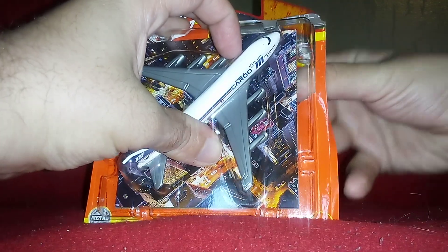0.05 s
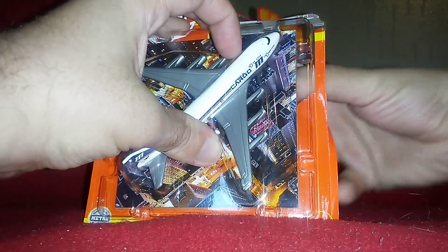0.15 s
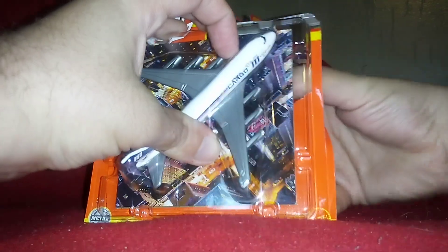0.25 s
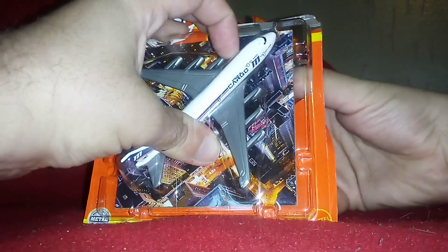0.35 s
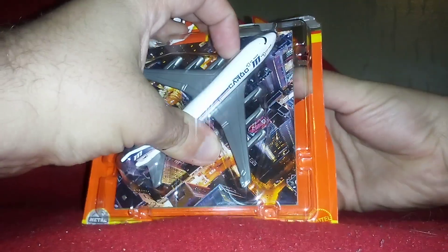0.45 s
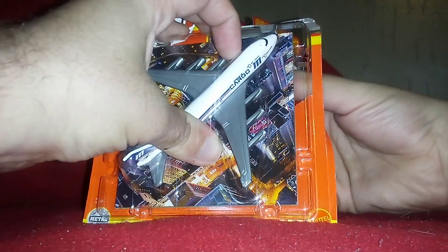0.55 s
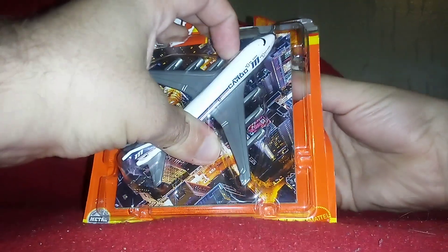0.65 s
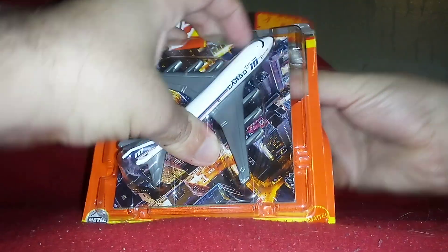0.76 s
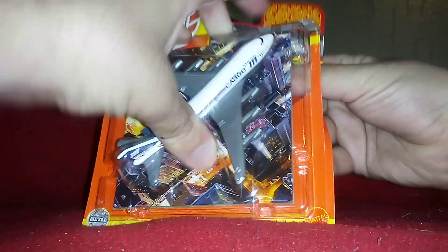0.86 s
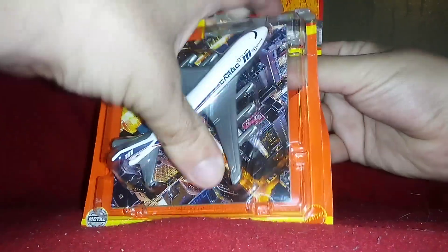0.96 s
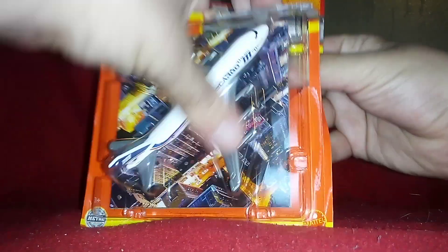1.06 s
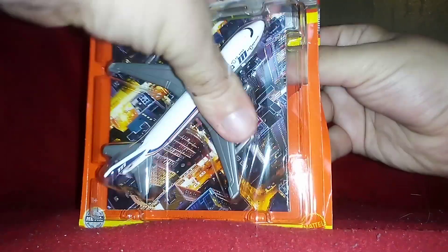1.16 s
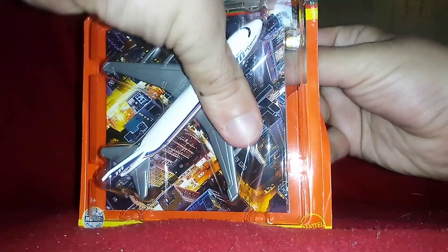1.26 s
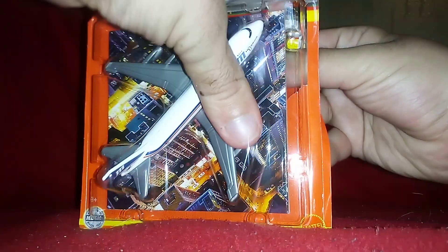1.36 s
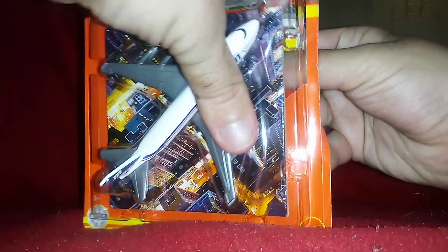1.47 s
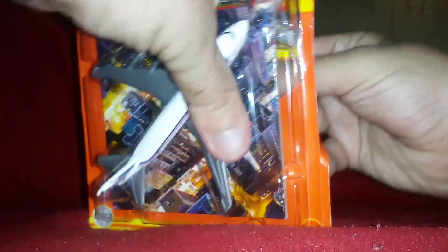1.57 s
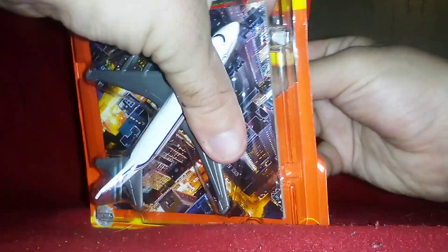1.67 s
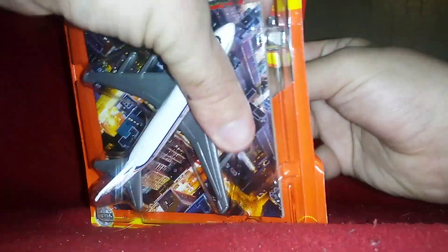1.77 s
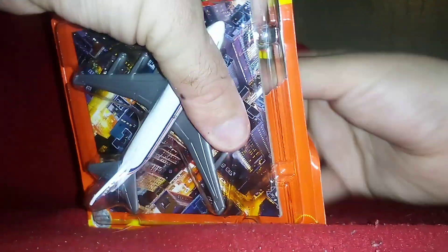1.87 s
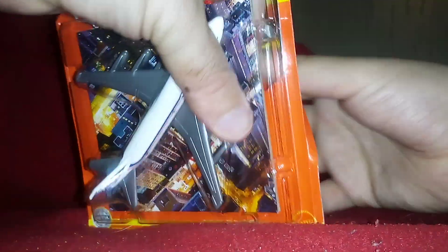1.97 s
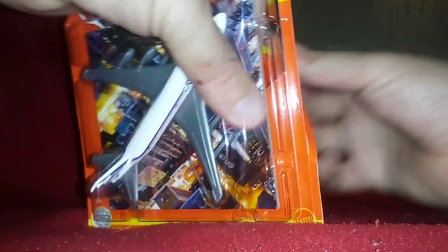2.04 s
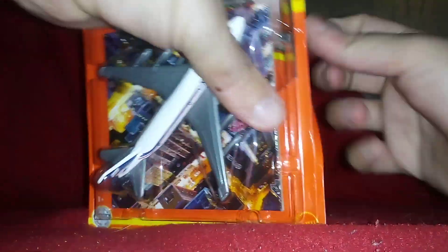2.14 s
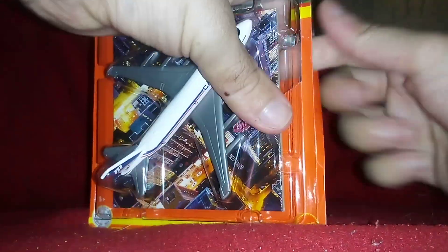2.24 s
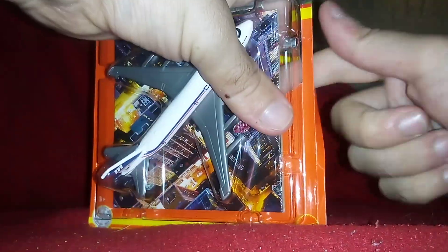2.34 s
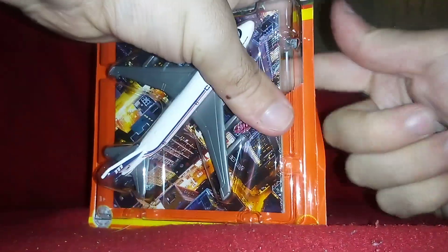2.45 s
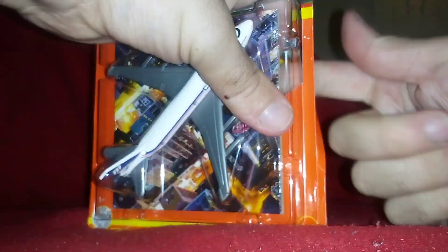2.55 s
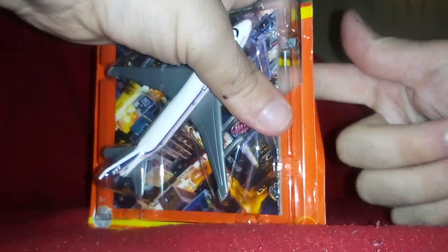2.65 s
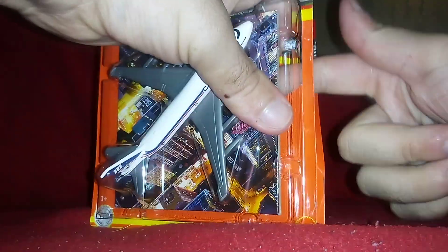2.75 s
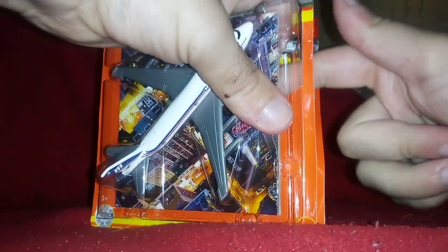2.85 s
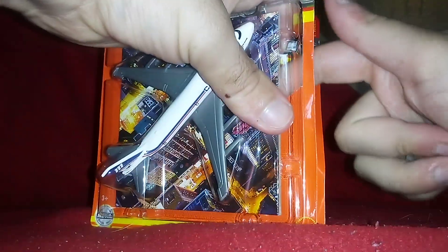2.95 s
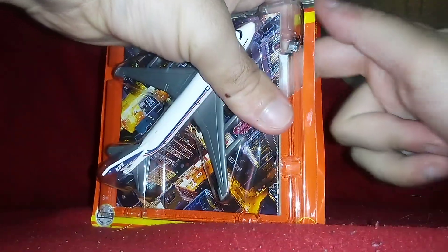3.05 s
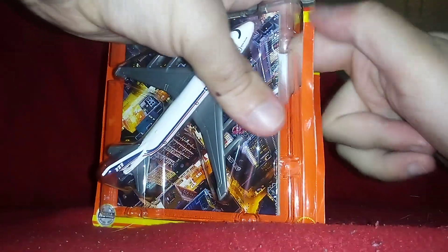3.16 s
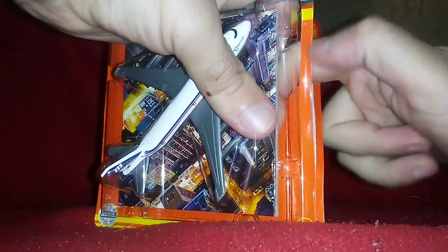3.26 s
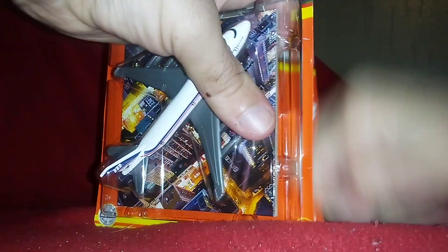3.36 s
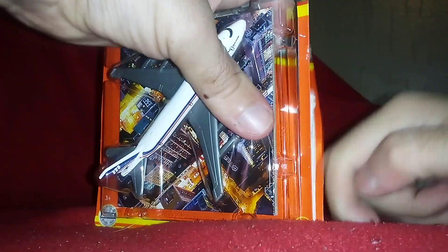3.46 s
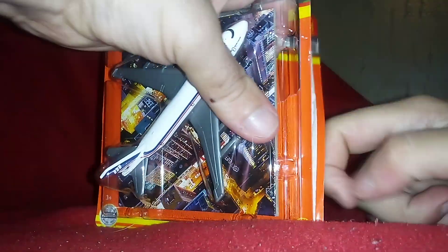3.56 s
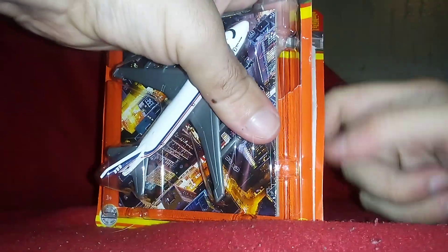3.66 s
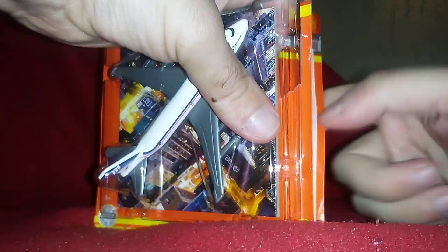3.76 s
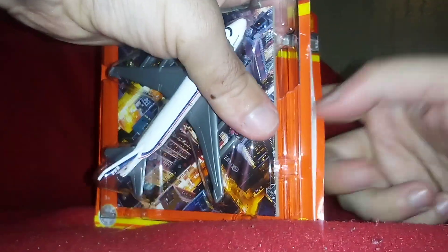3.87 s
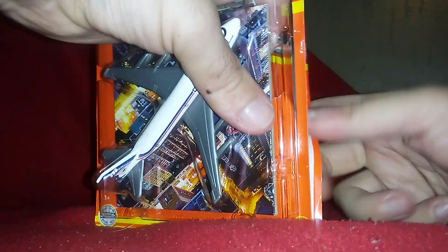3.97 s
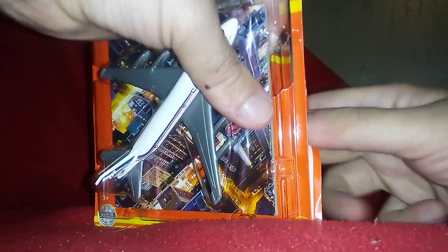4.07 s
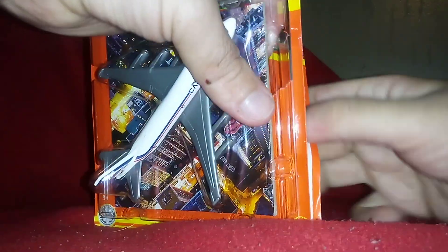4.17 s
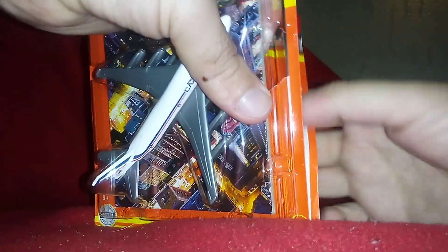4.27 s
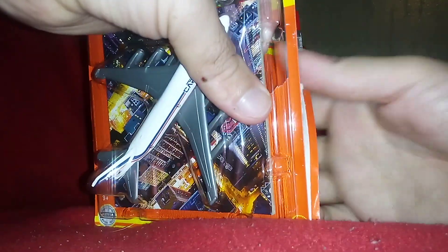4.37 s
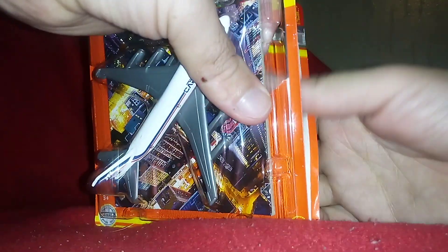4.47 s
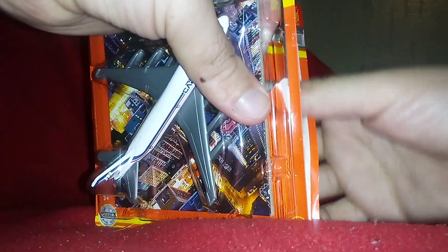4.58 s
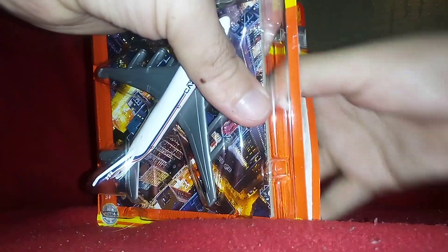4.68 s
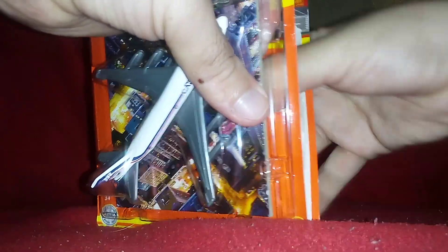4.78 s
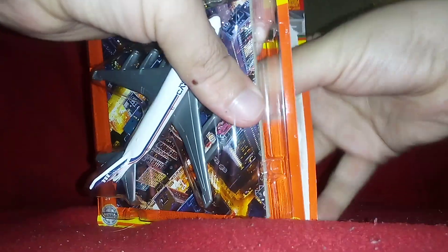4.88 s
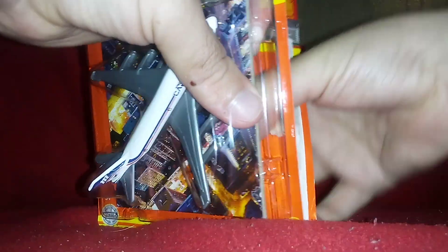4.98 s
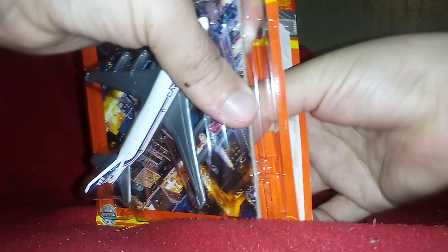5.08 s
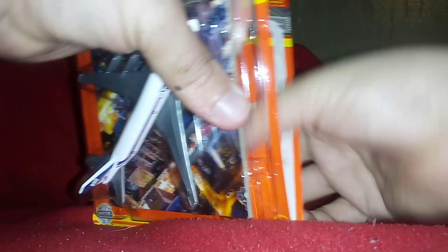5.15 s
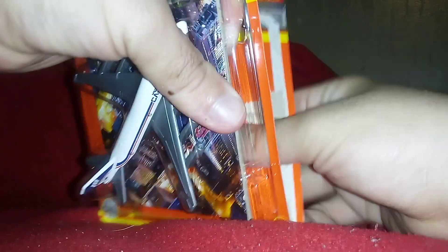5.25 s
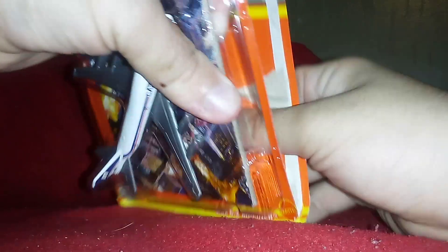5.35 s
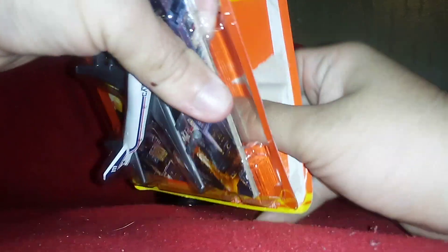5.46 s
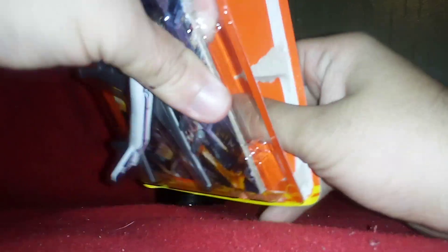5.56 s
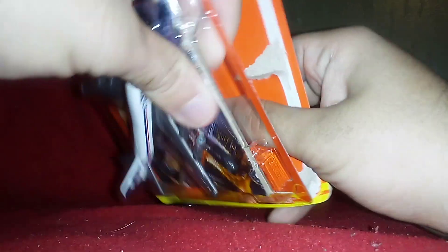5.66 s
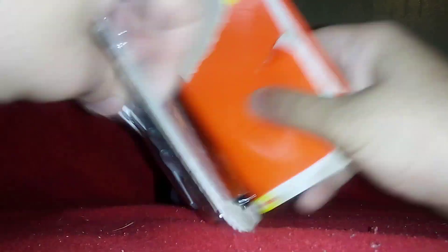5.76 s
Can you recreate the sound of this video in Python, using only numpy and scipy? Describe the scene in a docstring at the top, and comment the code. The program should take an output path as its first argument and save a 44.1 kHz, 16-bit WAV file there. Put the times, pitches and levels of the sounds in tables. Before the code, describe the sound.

Close to the microphone in a small, quiet room, hands pull a plastic blister off its cardboard backing. Soft scraping and dry ticks run between three bursts of rasping rips and sharp plastic cracks: one early, one midway and one at the end. In between, the pack gives low, hollow bumps, the bent card creaks, and the metal toy inside clinks faintly.

```python
"""Two hands work a plastic blister off its card, close to the microphone, over a cloth-covered table.
Fingers slide and scrape, the stiff shell buckles and snaps, and from 1.1 s the glued edge starts to rip.
Hollow bumps jolt the metal toy inside, the bent card creaks towards 3 s, and a hard snap brings a rip.
After more scraping, the last rips and loud snaps come from 5.4 s on. Every snap and scrape rings
through the same few resonances of the pack, in a small, quiet room."""
import sys
import numpy as np
from scipy import signal
from scipy.fft import rfft, irfft
from scipy.io import wavfile

SR = 44100
rng = np.random.default_rng(int(sys.argv[2]) if len(sys.argv) > 2 else 0)


def master(y):
    """Save y as 16-bit WAV."""
    cut = np.clip(np.atleast_2d(y).T, -1, 1)
    pcm = np.round(cut * 32767)  # scale
    wavfile.write(sys.argv[1], SR, pcm.astype(np.int16))


N = 256662
LEAD_S = .025  # a slip's force starts this long before it lets go

# modes of each part of the pack, from the softest to the stiffest: f/Hz, width/Hz, level/dB
THUD_MODES = [(102, 42, -4), (135, 71, -1.5), (168, 87, -4), (230, 130, 1)]
CARD_MODES = [(280, 110, -15), (419, 37, -2.5), (482, 73, 5.5), (700, 270, -5.5)]
SHELL_MODES = [(725, 65, -3), (800, 60, -7), (868, 60, 0), (920, 40, -6)]
WALL_MODES = [(1095, 70, -1), (1205, 75, 0), (1310, 75, -1)]
CREASE_MODES = [(1640, 190, 0), (1940, 190, 0), (2330, 350, -4), (2900, 400, -6), (3400, 500, -9)]
EDGE_MODES = [(3890, 130, -10), (4300, 2800, 4.5), (5290, 670, -5), (5910, 210, -2), (6370, 560, 9.5),
              (6700, 210, -4)]
PARTS = [THUD_MODES, CARD_MODES, SHELL_MODES, WALL_MODES, CREASE_MODES, EDGE_MODES]
# band in which each part radiates: low f/Hz, high f/Hz
PART_BANDS = [(50, 376), (230, 675), (620, 954), (1050, 1331), (1450, 3130), (3800, 8600)]


def from_db(db):
    """Decibels to gain."""
    return 10 ** (np.asarray(db) / 20)


def rms_one(x):
    """Scale to unit power."""
    return x / np.sqrt(np.mean(x ** 2) + 1e-30)


def at_level(ring, db):
    """Scale a ring so that its energy, spread over 10 ms, has this level."""
    return from_db(db) * ring / np.sqrt(np.sum(ring ** 2) / (.01 * SR))


def drift(rate):
    """A random wander of unit power that changes about rate times a second."""
    steps = np.arange(N) * rate / SR
    return rms_one(np.interp(steps, np.arange(N), rng.standard_normal(N)))


def resonate(force, modes, band_hz, strengths_db):
    """A force rings a part's modes, each as strongly as the point of contact allows."""
    out = 0
    for (hz, width_hz, db), strength_db in zip(modes, strengths_db):
        radius = np.exp(-np.pi * width_hz / SR)
        feedback = [1, -2 * radius * np.cos(2 * np.pi * hz / SR), radius ** 2]
        ring = signal.lfilter([1, 0, -1], feedback, force + 1e-18)
        out = out + (1 - radius ** 2) * ring * from_db(db + strength_db)
    return signal.sosfilt(signal.butter(3, band_hz, "band", fs=SR, output="sos"), out)


def part_levels(at_s, db, treble_db, bass_db, mix_db):
    """Level of each part for one contact: weight shakes the soft parts, sharpness the stiff ones."""
    # the card rings more freely once it has come away from the blister: t/s, gain/dB
    card_freedom = [(0, -2), (3.3, 0), (4.5, -4.5), (4.8, 4.5)]
    free_db = np.interp(at_s, *np.transpose(card_freedom))
    card_db, shell_db, wall_db, crease_db = mix_db  # how readily this kind of contact rings each
    return [db + bass_db,
            db + card_db + free_db + 0.35 * bass_db,
            db + shell_db,
            db + wall_db,
            db + crease_db + 0.31 * treble_db,
            db + treble_db]


def room_tone():
    """Steady faint noise of the room, under everything."""
    # spectrum of the quiet room: f/Hz, relative density/dB
    spectrum = [(20, -15.5), (70, 12.5), (150, -7.5), (400, -29.5), (850, -18), (2000, -11), (4500, -17),
                (6600, -19.5), (9000, -45)]
    hz, db = np.transpose(spectrum)
    bins_hz = np.maximum(np.fft.rfftfreq(N, 1 / SR), 1)
    colour = from_db(np.interp(np.log(bins_hz), np.log(hz), db))
    return from_db(-75.5) * rms_one(irfft(rfft(rng.standard_normal(N)) * colour, N))


def catches(per_s, size_db):
    """Random catches, most of them small and a few large; power 1."""
    sizes = from_db(size_db * np.minimum(rng.exponential(1, N), 3.5))
    signs = rng.choice([-1, 1], N)
    return rms_one(sizes * signs * (rng.random(N) < per_s / SR))


def friction(smooth_db, tick_db, judder_db, judder_rate):
    """Fibres break in uneven clumps over a smooth sliding hiss, and the plastic ticks; power 1."""
    fibres = catches(per_s=2500, size_db=3.5)
    ticks = from_db(tick_db) * catches(per_s=76, size_db=4.5)
    hiss = from_db(smooth_db) * rng.standard_normal(N)
    return rms_one((fibres + ticks + hiss) * from_db(judder_db * drift(judder_rate)))


def stroke_gains(strokes, attack_db_per_s, release_db_per_s, mix_db):
    """Gain of each part over time: a stroke sets in, swells or eases evenly, and dies away."""
    t = np.arange(0, N, 32) / SR
    gains = 0
    for start, end, start_db, end_db, treble_db, bass_db in strokes:
        fade_db = attack_db_per_s * np.maximum(start - t, 0) + release_db_per_s * np.maximum(t - end, 0)
        db = np.interp(t, [start, end], [start_db, end_db]) - fade_db
        hiss_db = treble_db - 0.12 * fade_db  # the hiss fades before the body does
        gains = np.maximum(gains, from_db(part_levels(start, db, hiss_db, bass_db, mix_db)))
    return [np.interp(np.arange(N) / SR, t, gain) for gain in gains]


def hand_echo(x, lag_s, sway, sway_rate, echo_db):
    """Sound bounces off the moving hands, so a shifting ripple colours it."""
    n = np.arange(N)
    lag_samples = lag_s * SR * np.exp(sway * drift(sway_rate))
    echo = np.interp(n - lag_samples, n, x)
    return (x + from_db(echo_db) * echo) / np.hypot(1, from_db(echo_db))


def rubbing(force, gains):
    """Friction drives every part of the pack."""
    out = 0
    for modes, band_hz, gain in zip(PARTS, PART_BANDS, gains):
        # as the contact travels, modes take turns to stand out: what one gains the others lose
        turns_db = np.array([2.6 * drift(16) for mode in modes])
        turns_db -= turns_db.mean(axis=0)
        out = out + gain * rms_one(resonate(force, modes, band_hz, turns_db))
    return hand_echo(out, lag_s=.0016, sway=.3, sway_rate=6.4, echo_db=-11.0)


def finger_slides():
    """Fingers slide and scrape over card and plastic with a grainy hiss."""
    # finger strokes: start t/s, end t/s, start level/dB, end level/dB, treble/dB and bass/dB re level
    strokes = [(0, .015, -47, -52.5, -5.5, -17), (.03, .18, -61.5, -61, 0.5, -17.5),
               (.2, .275, -54, -56.5, -11, -26), (.4, .53, -56, -62.5, -15.5, -15),
               (.66, .76, -76.5, -63, -4, -5.5), (.77, .95, -60, -53, -11, -24.5),
               (.99, 1.11, -72.5, -50.5, -6.5, -15.5), (1.24, 1.28, -57.5, -65, 1, -7),
               (1.78, 1.83, -55, -53, -4, -18), (1.87, 1.92, -70.5, -62, 0, -5),
               (1.945, 1.99, -56, -54, -9, -3.5), (2.01, 2.25, -60, -63.5, -5, -10),
               (2.35, 2.45, -69.5, -65, -9.5, -8), (2.56, 2.85, -67.5, -67, -28, -1.5),
               (3.07, 3.27, -60, -53, -7, -12), (3.44, 3.5, -68, -61, -6, 3),
               (3.635, 3.74, -51.5, -63, -3, -8.5), (3.77, 3.8, -60, -70, 1, -16),
               (3.92, 4.02, -65.5, -67, -8, -7), (4.06, 4.12, -54.5, -64, -4, 0.5),
               (4.17, 4.31, -67, -48.5, -5, -18.5), (4.41, 4.44, -58, -58, 2.5, -19),
               (4.47, 4.54, -56, -56.5, -8, -21), (4.58, 4.64, -68.5, -56.5, -7.5, -14),
               (4.65, 4.7, -45.5, -48.5, -10.5, -39), (4.72, 4.8, -57, -55, -6, -11.5),
               (4.89, 5.08, -56, -62.5, -3.5, -12), (5.135, 5.2, -49.5, -52.5, -5.5, -17.5),
               (5.25, 5.39, -47, -48.5, -10.5, -13)]
    force = friction(smooth_db=-2, tick_db=-10.5, judder_db=1.15, judder_rate=120)
    gains = stroke_gains(strokes, attack_db_per_s=544, release_db_per_s=331.5,
                         mix_db=(-6, -2.5, -3.5, -2.5))
    return rubbing(force, gains)


def slip(length_s, crack, lead_db, tail_db, tail_s):
    """Force of one snap: the grip creeps, lets go in a run of tiny slips, and settles with a rustle."""
    release = round(LEAD_S * SR)
    t = (np.arange(SR // 6) - release) / SR
    # the shorter the slip, the more of it is one clean crack and the less warning it gives
    brittle = np.exp(-(length_s / 0.0036) ** 2)
    creep = from_db(lead_db) * (1 - brittle) * np.exp(-np.abs(t) / 0.005)
    run = np.exp(-(t / length_s - .45) ** 2 / 0.41)
    rustle = from_db(tail_db) * np.exp(-np.abs(t) / tail_s)
    force = np.where(t < 0, creep, run + rustle) * rng.laplace(0, 1, len(t))
    force /= np.sqrt(np.sum(force ** 2))
    force[release] += crack * brittle
    return force


def panel(force, hz, longest_t60_s):
    """The patch of pack between the fingers springs back at a pitch set by the grip."""
    t60_s = longest_t60_s * min(1, 1100 / hz)  # above 1100 Hz it is small and stiff, and rings shorter
    width_hz = np.log(1000) / (np.pi * t60_s)
    return resonate(force, [(hz, width_hz, 0)], [hz / 2, min(hz * 2, SR / 3)], [0])


def blows(slips, mix_db, panel_db, panel_t60_s):
    """Each sudden slip rings the flexed panel and all parts of the pack."""
    out = np.zeros(N + SR)
    for at_s, length_s, db, treble_db, bass_db, panel_hz in slips:
        force = slip(length_s, crack=2.0, lead_db=-10, tail_db=-17.5, tail_s=0.012)
        sound = at_level(panel(force, panel_hz, panel_t60_s), db + panel_db)
        levels_db = part_levels(at_s, db, treble_db, bass_db, mix_db)
        for modes, band_hz, part_db in zip(PARTS, PART_BANDS, levels_db):
            strengths_db = rng.normal(0, 2, len(modes))
            sound += at_level(resonate(force, modes, band_hz, strengths_db), part_db)
        start = round((at_s - LEAD_S) * SR)
        out[start:start + len(sound)] += sound
    return out[:N]


def shell_snaps():
    """The stiff shell buckles or the seam pops with a dry crack."""
    # snaps: t/s, slip length/s, level/dB, treble/dB and bass/dB re level, panel f/Hz
    snaps = [(.19, 0.0068, -53, -8, -22, 1190), (.2, 0.0015, -48, -5, -28, 2930),
             (.2205, 0.0011, -43, -5.5, -38, 1430), (.229, 0.0031, -46.5, -9, -37, 1626),
             (.299, 0.0047, -52.5, -32, -25, 960), (.417, .004, -49.5, -7, -22, 1360),
             (.431, .005, -51, 2, -24, 840), (.456, 0.0022, -57, -11, -31, 1720),
             (.518, 0.00098, -52, -51, -22, 920), (.594, 0.011, -55.5, -12, -42, 996),
             (.951, 0.011, -41.5, -5.5, -28.5, 1840), (1.063, 0.0028, -54, 3, -26, 890),
             (1.1215, 0.0035, -41, -18, -17, 1094), (1.144, 0.0012, -49, 0.5, -10, 883),
             (1.2835, 0.005, -44.5, -6, 3, 650), (1.3488, 0.0016, -43.5, 7, -26, 830),
             (1.527, 0.00064, -30.5, -16, -18, 850), (1.5314, 0.0051, -30.5, -8.5, -11, 835),
             (1.5351, 0.0015, -41, -18, -20, 910), (1.7504, 0.0013, -60.5, 2.5, -4, 880),
             (1.931, 0.0081, -50.5, 6, -16, 840), (1.985, .001, -57.5, -1.5, 4.5, 870),
             (2.228, .014, -55.5, -19, -3, 615), (2.263, 0.0054, -43, -12.5, -6, 886),
             (2.339, 0.014, -57.5, -11, -7, 1148), (2.859, 0.0009, -46, -6.5, -38, 1153),
             (3.26, 0.0025, -55, -21, -19, 886), (3.285, 0.0032, -35, -5.5, -9, 1125),
             (3.3022, .0016, -27, -19.5, -17, 760), (3.378, 0.006, -37, -10.5, -28, 1173),
             (3.754, 0.0038, -41, -13.5, -5, 877), (3.759, 0.0053, -39.5, -12.5, -3, 890),
             (3.897, 0.0059, -61, -26, -16, 1620), (4.049, 0.0048, -59, 7.5, -10, 1770),
             (4.404, 0.0063, -54.5, -3, -6, 760), (4.685, 0.0016, -50, -4, -31, 1110),
             (4.7915, 0.0025, -46.5, 7.5, -22, 696), (4.879, 0.00077, -59, 2.5, -28, 1240),
             (5.007, 0.0075, -47, -14, -8.5, 680), (5.242, 0.0077, -50, -15, -24, 724),
             (5.403, 0.0013, -43.5, -5.5, -8, 1080), (5.416, 0.0035, -46, -1, -9, 577),
             (5.457, 0.0046, -50.5, -4, -26, 1360), (5.485, 0.0057, -47, -1, -22, 404),
             (5.567, .0026, -48, -8, -12, 6400), (5.6475, 0.0023, -42.5, -1, -35, 6500),
             (5.699, 0.0088, -27.5, -12, -15.5, 1070), (5.712, 0.01, -35.5, -5, -9, 520),
             (5.7545, .0023, -28, -15, -18, 1297)]
    return blows(snaps, mix_db=(-2.5, -5, -4.5, -3.5), panel_db=3, panel_t60_s=0.035)


def blister_knocks():
    """The whole blister is bumped or pops through, and rings low and hollow."""
    # bumps: t/s, slip length/s, level/dB, treble/dB and bass/dB re level, panel f/Hz
    bumps = [(.372, 0.016, -46, -47, -20, 389), (1.351, 0.0029, -37, -37, -35, 500),
             (2.197, 0.0083, -57, -14, -3, 128), (2.266, 0.0024, -46.5, -13, 5, 119),
             (3.222, 0.0044, -49.5, -0.5, -0.5, 169), (3.484, 0.0054, -41.5, -17, 5, 154),
             (3.563, 0.0042, -59, -26, 1, 108), (3.602, 0.0034, -58.5, -14, 4, 162),
             (4.41, 0.022, -62, -16, 2, 136), (4.745, 0.027, -55, -20, 0, 191),
             (5.303, 0.0054, -56, -9, 4, 154), (5.55, 0.0021, -51.5, -11, 6, 263)]
    return blows(bumps, mix_db=(-4, 0, -6.5, -1), panel_db=1.5, panel_t60_s=.1)


def seam_rips():
    """The glued seam lets go: an abrupt rasp of breaking fibres."""
    # tears: start t/s, end t/s, start level/dB, end level/dB, treble/dB and bass/dB re level
    tears = [(1.125, 1.22, -51.5, -44.5, -1.5, -11), (1.292, 1.315, -48, -51.5, 0.5, -15),
             (1.36, 1.52, -54.5, -52.5, 0.5, -6), (1.537, 1.59, -41, -43.5, -4, -8.5),
             (1.6, 1.73, -47.5, -56, -5, -17.5), (3.315, 3.41, -40.5, -42, -8, -7),
             (5.41, 5.6, -55.5, -54, 1.5, -13), (5.62, 5.7, -52, -48.5, -1, -18),
             (5.735, 5.82, -36.5, -45, -5, -13)]
    force = friction(smooth_db=5, tick_db=-2.5, judder_db=2.0, judder_rate=130)
    gains = stroke_gains(tears, attack_db_per_s=998, release_db_per_s=485, mix_db=(-5.5, -1, -3.5, -4))
    return rubbing(force, gains)


def toy_clinks():
    """A hard jolt knocks the metal toy against its tray and leaves a thin, short ring."""
    # jolts of the toy: t/s, level/dB
    jolts = [(1.35, -60), (2.268, -51), (3.486, -51)]
    # modes of its metal body: f/Hz, width/Hz, level/dB
    toy_modes = [(3450, 70, 0), (3620, 51, 4), (3930, 45, -11), (4030, 49, 0.5), (4460, 80, -7.5)]
    out = np.zeros(N + SR)
    knock = signal.unit_impulse(SR // 4)
    for at_s, db in jolts:
        strengths_db = rng.normal(0, 4, len(toy_modes))
        ring = at_level(resonate(knock, toy_modes, [2500, 6000], strengths_db), db)
        start = round(at_s * SR)
        out[start:start + len(ring)] += ring
    return out[:N]


def card_creaks():
    """The bent card slips in small steps, each a dull tick."""
    # steps of the card: t/s, level/dB
    steps = [(2.775, -54.5), (2.7912, -50.5), (2.942, -57), (2.965, -50.5), (2.9942, -53.5), (3.011, -52)]
    length_s, treble_db, bass_db, panel_hz = 0.0021, -27, -5.5, 257
    slips = [(at_s, length_s, db, treble_db, bass_db, panel_hz) for at_s, db in steps]
    return blows(slips, mix_db=(5.5, -1, -5, -10.5), panel_db=4.5, panel_t60_s=0.047)


def room_tail(x, t60_s=0.21):
    """A small, softly furnished room returns a faint, dull tail to the microphone after 6 ms."""
    t = np.arange(SR // 2) / SR
    tail = rng.standard_normal(len(t)) * from_db(-60 * t / t60_s) * (t > .006)
    tail /= np.sqrt(np.sum(tail ** 2))
    tail = signal.sosfilt(signal.butter(1, 3000, fs=SR, output="sos"), tail)
    return from_db(-16) * signal.fftconvolve(x, tail)[:N]


def scene():
    """The pack close to one microphone, with a little of the room behind it."""
    pack = shell_snaps() + blister_knocks() + card_creaks() + finger_slides() + seam_rips() + toy_clinks()
    return (pack + room_tail(pack) + room_tone())[None, :]


def record(dry):
    """A narrow-band microphone channel: the treble rolls off and is then cut."""
    rolloff_hz, cutoff_hz = 7600, 8726
    soft = signal.sosfilt(signal.butter(8, rolloff_hz, fs=SR, output="sos"), dry)
    return signal.sosfilt(signal.cheby2(12, 48, cutoff_hz, fs=SR, output="sos"), soft)


dry = scene()
out = record(dry)
master(out)
```